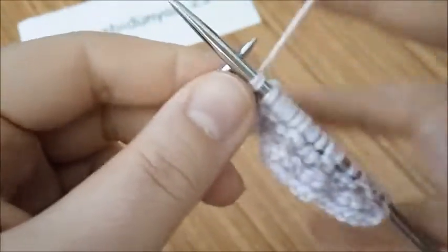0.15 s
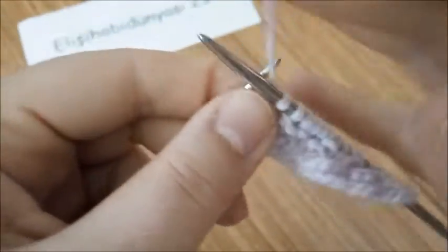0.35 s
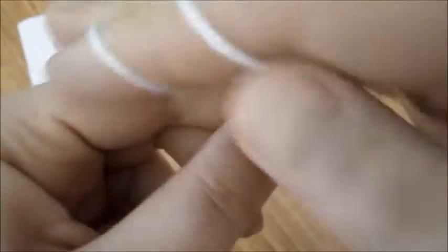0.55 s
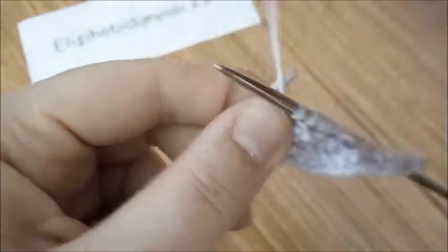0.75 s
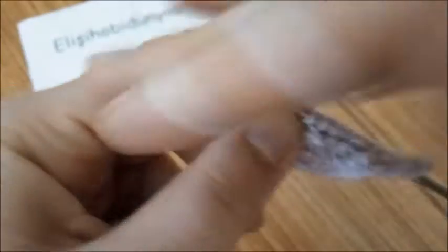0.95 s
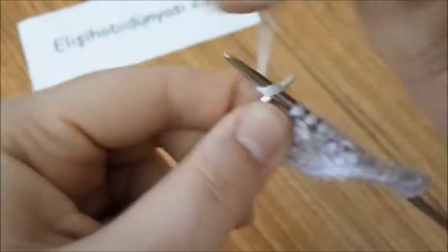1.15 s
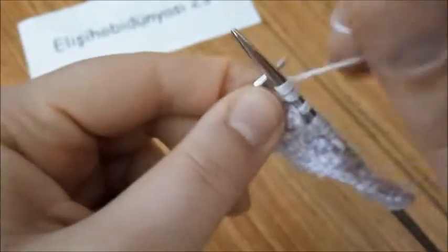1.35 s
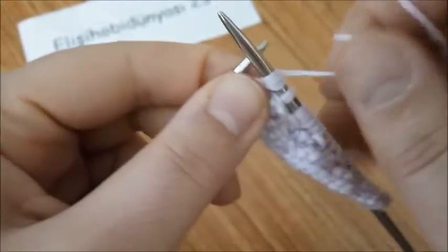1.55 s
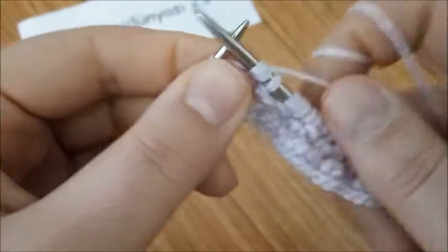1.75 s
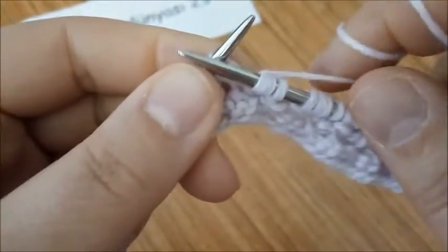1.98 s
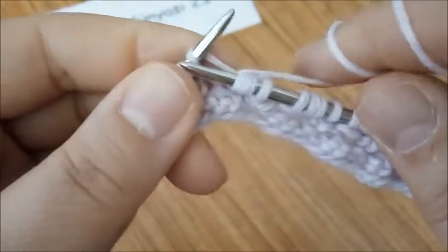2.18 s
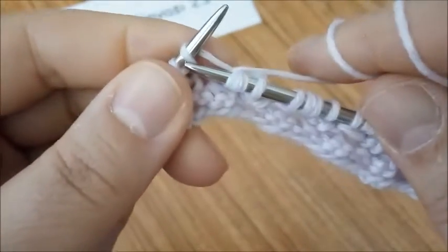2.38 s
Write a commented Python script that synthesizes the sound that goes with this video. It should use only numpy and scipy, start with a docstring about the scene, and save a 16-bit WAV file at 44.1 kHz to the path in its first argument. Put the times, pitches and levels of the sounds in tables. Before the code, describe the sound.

Metal knitting needles tap together in two quick clusters, with faint rubbing of yarn.

```python
"""In a small, quiet room, two steel knitting needles click together close to a stereo microphone.
Each click makes the finger-damped needles and their support ring; glancing hits also chatter briefly.
The low knock is mostly on the left, the bright ring on the right, and the room echoes both.
Yarn and needles slide, and the hands rumble and bump softly over a steady hiss.
A faint low hum hangs after the first click."""
import sys
import numpy as np
from scipy import signal
from scipy.fft import rfft, irfft, next_fast_len
from scipy.io import wavfile
from scipy.ndimage import map_coordinates

SR = 44100
rng = np.random.default_rng(int(sys.argv[2]) if len(sys.argv) > 2 else 0)


def to_wav(s):
    """Save 16-bit WAV."""
    ch = np.atleast_2d(s).T  # columns
    pcm = np.round(np.clip(ch, -1, 1) * 32767)  # PCM
    wavfile.write(sys.argv[1], SR, pcm.astype(np.int16))


N = 106854


def amp(db):
    """Turn decibels into a number to multiply by."""
    return 10 ** (np.asarray(db) / 20)


def unit(x):
    """Scale a sound so that its average (rms) level is 1."""
    return x / np.sqrt(np.mean(x ** 2) + 1e-20)


def fade(t, fade_s):
    """A smooth dying away; the fade time is how long it takes to drop 60 dB."""
    return np.exp(-np.log(1000) * t / fade_s)


def along(points, hz):
    """Read between rows of (frequency, value, ...) on a log frequency scale, one curve per value."""
    known_hz, *columns = np.transpose(points)
    return np.array([np.interp(np.log(hz + 1), np.log(known_hz + 1), column) for column in columns])


def filtered(x, response):
    """Turn each frequency of a sound up or down by response(hz)."""
    size = x.shape[-1]
    padded = next_fast_len(size + 8192)
    return irfft(rfft(x, padded) * response(np.fft.rfftfreq(padded, 1 / SR)), padded)[..., :size]


def noise(colour, size, tilt_db=0, tilt_from_hz=530):
    """Noise with one channel per level column of colour; tilt_db per octave brightens or dulls it."""
    def response(hz):
        octaves = np.log2(np.maximum(hz / tilt_from_hz, 1))
        return amp(along(colour, hz) + tilt_db * octaves)
    white = rng.standard_normal((len(colour[0]) - 1, size))
    return unit(filtered(white, response))


def add(track, start_s, sound):
    """Mix a sound into the track at its start time."""
    i = max(round(start_s * SR), 0)
    track[:, i:i + sound.shape[1]] += sound[:, :N - i]


def room_hush(shared_db=-65, side_db=-66):
    """The steady sound of the quiet room and the hiss of the microphone."""
    # noise that is the same on both sides (frequency [Hz], relative level [dB])
    shared_colour = [(20, -11), (45, -21.5), (75, -0.5), (110, -5.5), (190, -11), (265, -1.5), (350, -8),
                     (600, -12.5), (1100, -16.5), (6400, -19), (8200, -25), (13500, -30.5), (15100, -16.5),
                     (15700, -25), (16200, -38)]
    # noise that is opposite on the two sides, for width (frequency [Hz], relative level [dB])
    side_colour = [(20, -28), (90, -11.5), (190, -13.5), (265, -12), (400, -14), (1100, -19.5), (6400, -21),
                   (8500, -29), (13500, -31.5), (15100, -22), (15700, -24), (16200, -43)]
    shared = amp(shared_db) * noise(shared_colour, N)
    side = amp(side_db) * noise(side_colour, N)
    return shared + side * np.array([[1], [-1]])


def hand_rumble(right_db=-5):
    """The moving hands make a low rumble that rises and falls."""
    # how loud the hands are on the left (time [s], level [dB])
    movement = [(0, -72), (.34, -68.5), (.39, -65), (.52, -59), (.7, -76.5), (.85, -74), (1.05, -72),
                (1.3, -66), (1.5, -70), (2.42, -88)]
    # tone of the rumble (frequency [Hz], relative level [dB])
    colour = [(25, -33), (75, -10.5), (125, -10.5), (180, -8.5), (400, -63), (2000, -60)]
    level_db = np.interp(np.arange(N) / SR, *np.transpose(movement))
    return amp(level_db) * noise(colour, N) * amp([[0], [right_db]])


def low_hum(start_s=0.347, hz=126.9, rise_s=0.021, fade_s=0.62, gain_db=-45.5, right_db=-6):
    """A faint low tone swells with the first click and dies away."""
    t = np.maximum(np.arange(N) / SR - start_s, 0)
    shape = (1 - np.exp(-t / rise_s)) * fade(t, fade_s)
    return amp(gain_db) * shape * np.sin(2 * np.pi * hz * t) * amp([[0], [right_db]])


def needle_clicks(ring_room_db=-12, chatter_room_db=-0.5, tight_from_s=1.15, tight_db=-5):
    """Each hit rings and chatters; once gripped tighter, the needles send less ring into the room."""
    # needle hits (time [s], six strengths from low to high: body, knock, clack, ring, ping, sparkle [dB],
    # chatter level [dB], chatter tilt [dB per octave], lean to the left [dB], clack pitch [Hz])
    hits = [(0.352, -23.5, -16, -18, -12, -14.5, -16.5, -28.5, 10, 0.75, 1780),
            (0.4888, -22, -25.5, -29.5, -10.5, -10, -20, -21.5, 3.5, 3.1, 1787),
            (0.5702, -31, -40, -36, -23.5, -25, -44, -29.5, 0.5, 1, 1790),
            (0.627, -36.5, -39, -42.5, -43, -52, -49, -39, -2.5, -0.8, 1806),
            (0.6639, -34.5, -50, -42, -30, -57, -46, -36.5, -5.5, 1, 1790),
            (.6785, -32, -44, -45, -59, -68, -53, -42, -0.5, 1.4, 1820),
            (1.1098, -37.5, -51, -51, -44, -62, -70, -47, -1, 1, 1790),
            (1.195, -19.5, -27.5, -18, -20.5, -23, -25.5, -36, -4, -1.8, 1822),
            (1.3248, -23.5, -19.5, -26, -38, -34.5, -45.5, -42.5, -5.5, 1.5, 1810),
            (1.3635, -31, -26, -35, -41.5, -45, -49, -47, -9, 0.26, 1737),
            (1.381, -51, -35, -51, -62, -57, -61, -62, -13, 0.29, 1840),
            (1.6151, -23.5, -26, -21.5, -46.5, -45, -50.5, -57, 10, -5.4, 1840),
            (1.6438, -29.5, -34.5, -28.5, -55, -26.5, -45.5, -38, -0.5, 0.13, 1830),
            (1.6813, -42, -54, -40.5, -56, -58, -69, -52.5, -4, 0, 1860),
            (1.8208, -68, -72, -74, -63, -70, -54.5, -67, -5, 0.72, 1850),
            (1.9469, -70, -77, -79, -60, -64, -54.5, -58.5, 13.5, 0.77, 1780)]
    out, t = np.zeros((2, N)), np.arange(SR // 4) / SR
    for start_s, *strengths_db, chatter_db, tilt_db, lean_db, clack_hz in hits:
        ringing = ring(t, strengths_db, lean_db, clack_hz)
        skid = amp(chatter_db) * chatter(t, tilt_db)
        to_room_db = ring_room_db + tight_db * (start_s > tight_from_s)
        add(out, start_s, ringing + skid)
        add(out, start_s, room_echo(amp(to_room_db) * ringing + amp(chatter_room_db) * skid))
    return out


def ring(t, strengths_db, lean_db, clack_hz, usual_clack_hz=1795, left_lag_s=0.0003598):
    """Struck needles ring with many short tones; where the hit lands sets how strong each is."""
    # tones of the needles and their support (frequency [Hz], left [dB], right [dB], fade time [s])
    tones = [(300, -5.5, -19.5, 0.09), (397.4, -8.5, -18, 0.05), (533.2, -5.5, -34.5, 0.065),
             (955, -0.5, -5, 0.031), (965, -14.5, -1, 0.017), (1521, 7, -8.5, 0.011),
             (1784, 3.5, -8, 0.033), (2090, -17, -30, 0.03), (3050, -33, -17, 0.047),
             (3864, -58, -4, 0.026), (4923, -23, -0.5, 0.014), (6360, -2.5, 6.5, 0.01),
             (7510, -17, 1.5, 0.012), (8960, -15, -1, 0.016), (10450, -33, -10, 0.02),
             (12100, -21, -14.5, .012), (14900, -13, -12, 0.0084)]
    # where the six strengths of a hit apply (frequency [Hz])
    strength_hz = [530, 980, 1700, 3900, 5000, 6300]
    hz, left_db, right_db, fade_s = np.transpose(tones)
    strength_db = np.interp(np.log(hz), np.log(strength_hz), strengths_db)
    in_clack = (hz > 1300) & (hz < 2400)  # the grip retunes these middle tones
    hz = np.where(in_clack, hz * clack_hz / usual_clack_hz, hz)
    level_jitter, pitch_jitter = rng.standard_normal((2, len(hz)))  # no two hits are alike
    hz = hz * (1 + 0.004 * pitch_jitter)
    strength_db = strength_db + 1.82 * level_jitter
    age = np.maximum(np.array([t - left_lag_s, t]), 0)[:, None]  # the ring reaches the left later
    cycles = hz[:, None] * age
    rise = 1 - np.exp(-cycles)  # each tone builds up in about one cycle
    waves = np.sin(2 * np.pi * cycles) * fade(age, fade_s[:, None]) * rise
    gains = amp(np.array([left_db + lean_db, right_db - lean_db]) + strength_db)
    signs = (-1) ** np.arange(len(hz))  # every other tone starts by swinging the opposite way
    return ((gains * signs)[..., None] * waves).sum(axis=1)


def chatter(t, tilt_db, rise_s=0.0008, hold_s=0.0046, fade_s=0.021):
    """Steel skids on steel: a brief burst of noise that dies quickly."""
    # tone of the skid (frequency [Hz], relative left level [dB], relative right level [dB])
    colour = [(100, -10, -56), (308, -13, 21), (565, 15, -6), (1120, 1.5, 8), (2240, -16, 19.5),
              (2870, 16, 15.5), (3940, 19.5, 3.5), (5000, -10.5, 16.5), (5400, 9, 7), (6900, 3.5, 8),
              (9650, -39, -6.5), (12500, -21, -97), (16000, -13, -23)]
    shape = (1 - np.exp(-t / rise_s)) * fade(np.maximum(t - hold_s, 0), fade_s)
    return noise(colour, len(t), tilt_db) * shape


def room_echo(sound, build_s=0.011, wall_s=0.038, wall_spread_s=0.0032, wall_db=0.5):
    """Sound bounces around the small room, leaving a soft tail and a few lingering tones."""
    # how long the tail lasts (frequency [Hz], fade time [s])
    fade_times = [(130, 0.19), (400, 0.11), (1200, 0.23), (4000, 0.19), (12000, 0.23)]
    # tone of the tail (frequency [Hz], left level [dB], right level [dB])
    colour = [(130, 17, 6), (310, 8, -7), (580, 1.5, -7), (1050, 2, 6), (1840, -9.5, -7.5),
              (3880, -5, -5.5), (8100, -19.5, -5), (10600, -8, -3), (13000, -14, -20)]
    # standing waves, the room's own tones (frequency [Hz], level [dB], fade time [s])
    room_tones = [(302.9, -48, 0.23), (505, -46, 0.18), (969, -80, 0.78), (1340, -58, 0.53)]
    band_hz, frame_s, bands = signal.stft(rng.standard_normal((2, SR // 2)), SR, nperseg=256)
    bands = bands * fade(frame_s, along(fade_times, band_hz).T)
    tail = signal.istft(bands, SR, nperseg=256)[1]
    t = np.arange(tail.shape[1]) / SR
    wall_swell = np.exp(-.5 * ((t - wall_s) / wall_spread_s) ** 2)  # wall echoes arrive in a bunch
    tail = tail * amp(wall_db * wall_swell)
    tail = filtered(tail / np.linalg.norm(tail[0]), lambda hz: amp(along(colour, hz)))
    standing = sum(amp(db) * np.sin(2 * np.pi * hz * t) * fade(t, fade_s) for hz, db, fade_s in room_tones)
    standing = standing * amp([[0], [-30]])  # almost all on the left
    echo = (tail + standing) * (1 - np.exp(-t / build_s))
    return signal.fftconvolve(sound.sum(axis=0)[None], echo, axes=1)


def sliding(rise_share=0.17, fall_s=0.026, grain_db=1.5, grains_per_s=140):
    """Yarn and steel rub with a grainy hiss; longer strokes swell more slowly."""
    # sliding strokes (start [s], length [s], level [dB])
    strokes = [(0.486, 0.028, -39.5), (0.564, 0.012, -44), (0.686, 0.016, -58), (0.767, 0.088, -59),
               (0.944, .11, -51.5), (1.108, 0.01, -52), (1.513, 0.02, -61.5), (1.615, 0.08, -52),
               (2.249, 0.18, -66.5)]
    # tone of the rubbing (frequency [Hz], relative left level [dB], relative right level [dB])
    colour = [(119, -18, -15), (296, 16, -31), (390, 5, -3), (490, 12.5, -5), (860, -6.5, -4),
              (1060, 10, 6), (1490, -5, -2), (2780, -3, -1.5), (5560, -31.5, -20), (11000, -44, -23)]
    t, loudness = np.arange(N) / SR, np.zeros(N)
    for start_s, length_s, db in strokes:
        rise = 1 - np.exp(-np.maximum(t - start_s, 0) / (rise_share * length_s))
        fall = np.exp(-np.maximum(t - start_s - length_s, 0) / fall_s)
        loudness += amp(db) * rise * fall
    grain = map_coordinates(rng.standard_normal(N // 10), [t * grains_per_s])  # a smooth random wobble
    return loudness * unit(noise(colour, N) * amp(grain_db * grain))


def hand_bumps(hz=276.5, peak_s=0.0068, width_s=0.0037, right_db=-36, room_db=-22):
    """A dull bump of the hand under a click swells and dies within a few slow vibrations."""
    # bumps of the hand (time [s], level [dB])
    bumps = [(1.196, -12), (1.326, -26)]
    out, t = np.zeros((2, N)), np.arange(SR // 10) / SR
    swell = np.exp(-.5 * ((t - peak_s) / width_s) ** 2) * (1 - np.exp(-2 * hz * t))
    bump = swell * np.sin(2 * np.pi * hz * t) * amp([[0], [right_db]])
    for start_s, db in bumps:
        add(out, start_s, amp(db) * bump)
        add(out, start_s, room_echo(amp(db + room_db) * bump))
    return out


def scene():
    """Clicks, bumps, a hum and sliding over the quiet room and the rumble of the hands."""
    return needle_clicks() + hand_bumps() + low_hum() + sliding() + room_hush() + hand_rumble()


def record(dry):
    """The recorder cuts off the very highest treble."""
    top_hz = 16300
    return filtered(dry, lambda hz: 1 / (1 + (hz / top_hz) ** 120))


dry = scene()
out = record(dry)
to_wav(out)
```